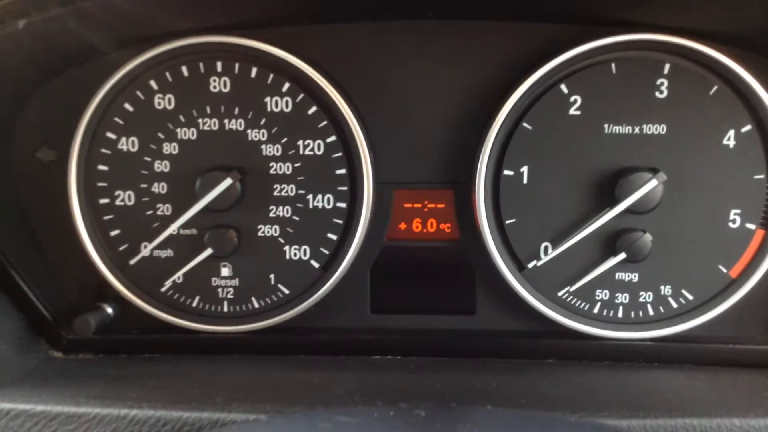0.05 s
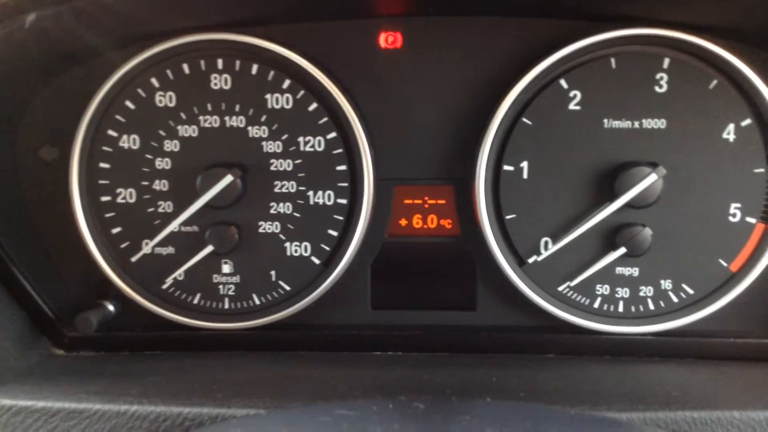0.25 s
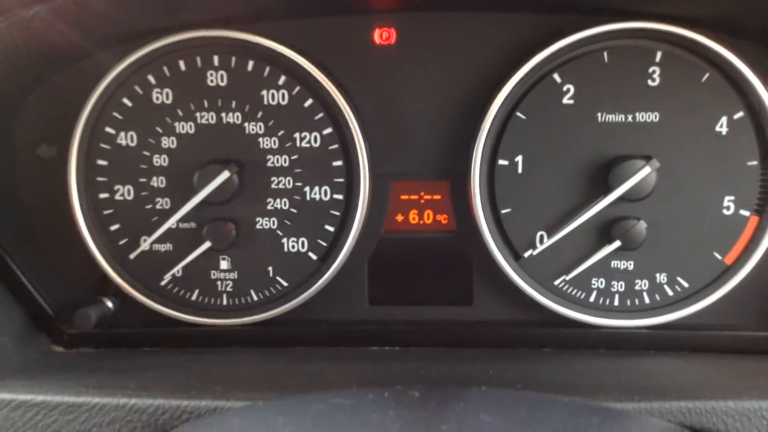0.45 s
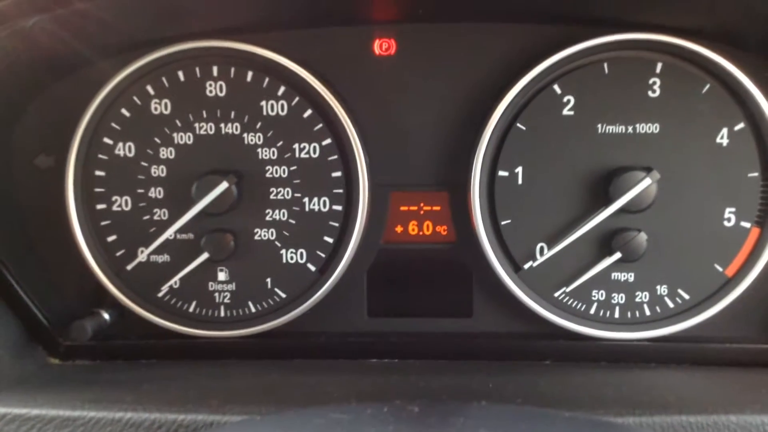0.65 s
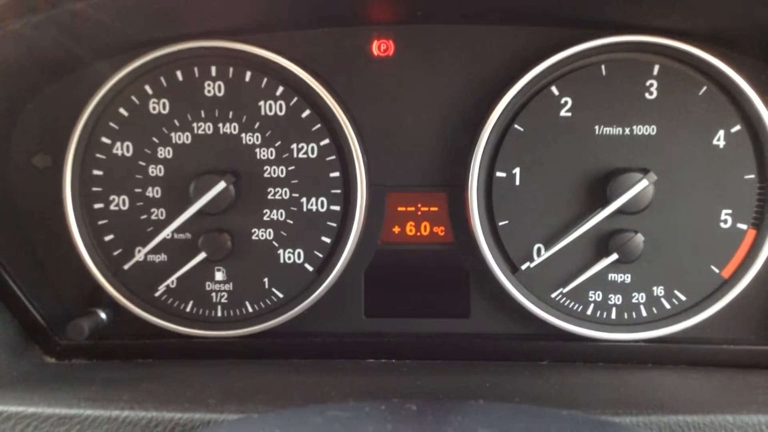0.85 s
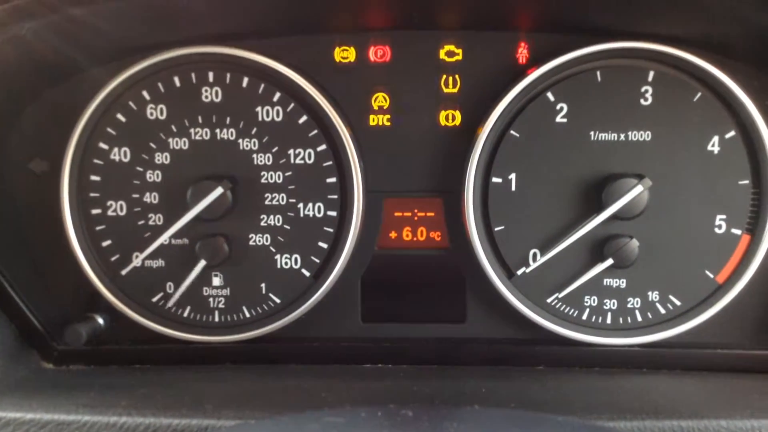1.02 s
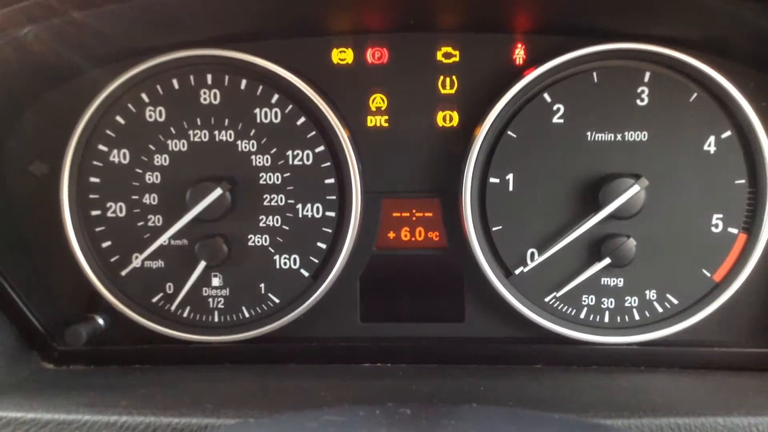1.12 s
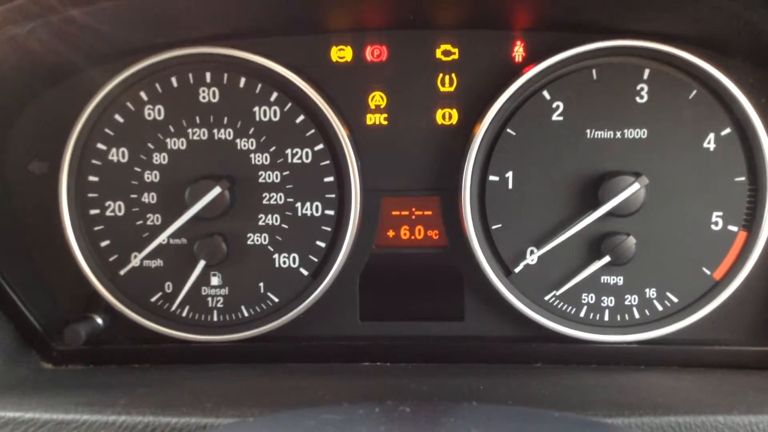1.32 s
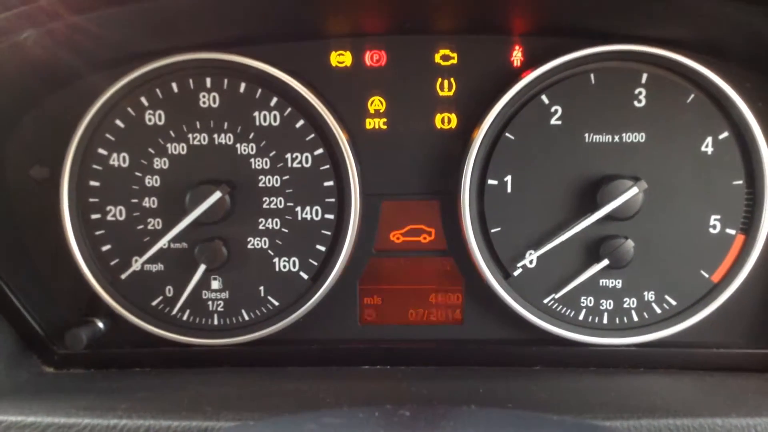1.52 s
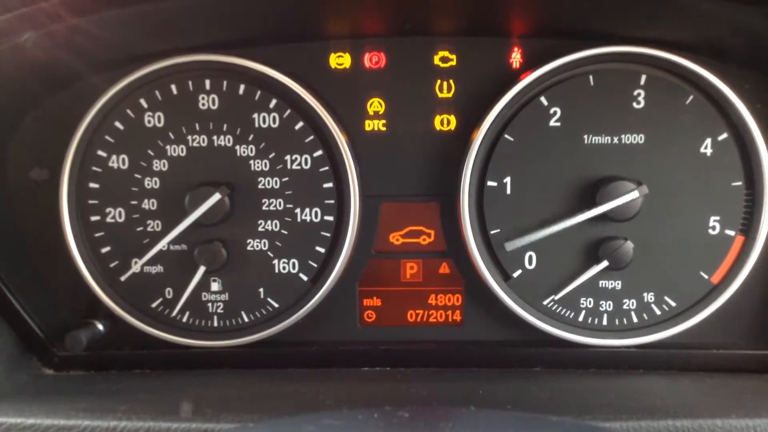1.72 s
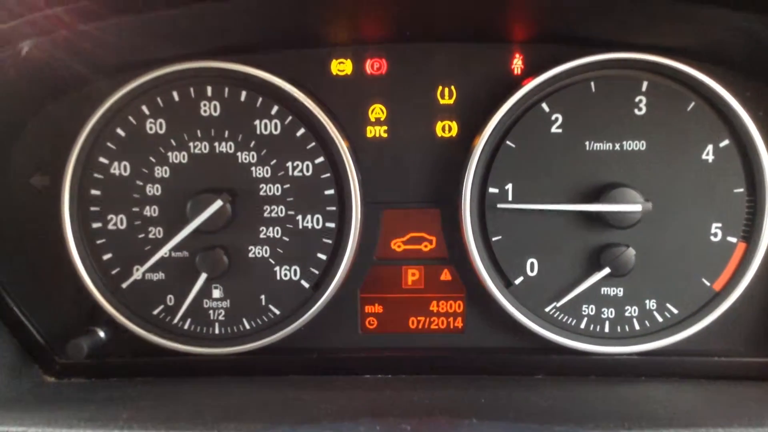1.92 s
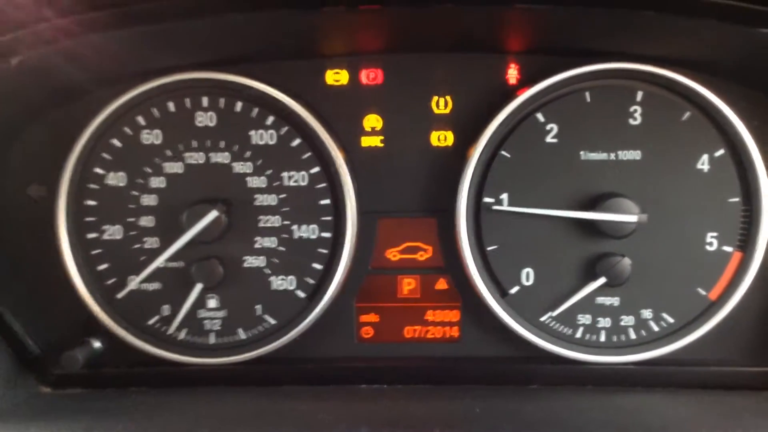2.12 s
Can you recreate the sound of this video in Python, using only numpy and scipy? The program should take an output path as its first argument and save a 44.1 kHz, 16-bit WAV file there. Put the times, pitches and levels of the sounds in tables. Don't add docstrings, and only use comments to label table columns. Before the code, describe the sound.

Diesel engine start inside a parked car, recorded close in a dry padded cabin; sleeve rustling and small clicks come first, then a relay click, rising and falling starter whir, two thuds and faint low rumbling.

```python
import sys
import numpy as np
from scipy import signal
from scipy.fft import rfft, irfft, next_fast_len
from scipy.io import wavfile
from scipy.ndimage import uniform_filter1d, map_coordinates

SR = 44100
rng = np.random.default_rng(int(sys.argv[2]) if len(sys.argv) > 2 else 0)


def dump(signal):
    limited = np.clip(np.atleast_2d(signal).T, -1, 1)
    pcm = np.round(limited * 32767).astype(np.int16)
    wavfile.write(sys.argv[1], SR, pcm)


def volts_from_decibels(level):
    exponent = np.asarray(level, float) / 20
    return 10 ** exponent


N = 95608


def unit(x):
    return x / np.sqrt(np.mean(x ** 2) + 1e-20)


def noise():
    return rng.standard_normal(N)


def curves(rows):
    s, *cols = np.transpose(rows)
    return [np.interp(np.arange(N) / SR, s, c) for c in cols]


def wobble(rate):
    return map_coordinates(rng.standard_normal(int(N * rate / SR) + 4), [np.arange(N) * rate / SR])


def filtered(x, response):
    m = next_fast_len(len(x) + 8192)
    return irfft(rfft(x, m) * response(np.fft.rfftfreq(m, 1 / SR)), m)[:len(x)]


def colour(x, points):
    f, db = np.transpose(points)
    return unit(filtered(x, lambda hz: volts_from_decibels(np.interp(np.log(hz + 1), np.log(f + 1), db, -120, -120))))


def resonant(x, peaks):
    def response(f):
        total = 0
        for k, (hz, width, db) in enumerate(peaks):
            total = total + (-1) ** k * volts_from_decibels(db) * 1j * f * width / (hz * hz - f * f + 1j * f * width)
        return total
    return unit(filtered(x, response))


def pulses(rate, scatter_db):
    return np.diff(np.floor(np.cumsum(rate) / SR), prepend=0) * volts_from_decibels(scatter_db * noise())


def gate(start, length, rise, fall):
    t = np.arange(N) / SR - start
    return np.clip(t / rise, 0, 1) * np.exp(-np.clip(t - length, 0, None) / fall)


def add(out, s, x):
    part = out[round(s * SR):][:len(x)]
    part += x[:len(part)]


def decay(t60):
    return volts_from_decibels(-60 * np.arange(SR // 5) / SR / t60)


def ring(hz, t60, attack):
    t = np.arange(SR // 5) / SR
    drift = np.cumsum(rng.standard_normal(len(t))) * hz / 1e5
    return decay(t60) * (1 - np.exp(-t / attack)) * np.sin(2 * np.pi * hz * t + drift)


def crack(t60):
    return decay(t60) * rng.standard_normal(SR // 5)


# freq_hz, density_db_per_hz
HISS_COLOUR = [(15, -73), (25, -48), (86, 4), (469, -2), (598, -5), (919, -10), (9550, -11.5),
               (11800, -12.5), (15500, -12.5)]


def hiss():
    return volts_from_decibels(-67 + 0.75 * wobble(10.6)) * colour(noise(), HISS_COLOUR)


# start_s, level_db, rub_db
HAND_MOVES = [
    [(0, -43.5, -38.5), (.05, -46.5, -48), (.13, -60.5, -57.5), (.175, -59, -57.5), (.205, -60, -46),
     (.25, -61.5, -61.5), (.39, -65, -61), (.62, -77, -74.5)],
    [(1.86, -87, -54), (2.0, -62, -40), (2.07, -54.5, -38), (2.17, -61.5, -41)],
]
# freq_hz, density_db_per_hz
CLOTH_COLOUR = [(710, -20), (1200, -18), (3610, 0), (4340, 0), (13600, -7), (15500, -7)]
# freq_hz, density_db_per_hz
RUB_COLOUR = [(24, -61), (40, -63), (117, 0.5), (393, -8.5), (483, -6.5), (2500, -19), (3250, -30),
              (5500, -120)]
# start_s, peak_db,
# pitch_hz, t60_s
DULL_KNOCKS = [(.004, -40, 150, .06), (.017, -33, 170, .07), (.019, -41, 640, .05), (.026, -34, 260, .06),
               (.049, -46, 490, .05), (.075, -45, 110, .12), (.182, -38, 150, .1), (.198, -42, 600, .06),
               (.2, -44, 410, .06), (.362, -53, 730, .04), (.41, -52, 1000, .06), (.44, -52, 190, .08),
               (.451, -53, 1250, .04), (.582, -56, 670, .04), (.685, -54, 620, .03), (.748, -57, 1750, .03),
               (.772, -52, 190, .06), (1.035, -48, 140, .08), (1.352, -50, 78, .2), (1.26, -49, 180, .06),
               (1.615, -41, 245, .25), (1.622, -40, 125, .3), (1.695, -50, 900, .04),
               (1.622, -48, 450, .08), (1.675, -49, 400, .08), (1.765, -47, 400, .12),
               (1.89, -51, 310, .08), (2.005, -48, 400, .1), (2.012, -50, 620, .07), (2.025, -51, 850, .06),
               (1.465, -48, 90, .2), (2.07, -50, 345, .3), (2.115, -47, 180, .1)]


def hand():
    out = np.zeros(N)
    for rows, rub_trim_db in zip(HAND_MOVES, (0, -12)):
        level_db, rub_db = curves(rows)
        grain = volts_from_decibels(1.65 * wobble(150) + wobble(30.65))
        rustle = volts_from_decibels(level_db) * colour(grain * noise(), CLOTH_COLOUR)
        rub = volts_from_decibels(rub_db + rub_trim_db + wobble(37.24)) * colour(noise(), RUB_COLOUR)
        start_s, end_s = rows[0][0], rows[-1][0]
        out += (rustle + rub) * gate(start_s - .05, end_s - start_s + 0.053, 0.13, 0.13)
    for start_s, peak_db, hz, t60_s in DULL_KNOCKS:
        add(out, start_s, volts_from_decibels(peak_db) * ring(hz, t60_s, .5 / hz))
    return out


# start_s, peak_db, pitch_hz, broadband_share_db
PLASTIC_CLICKS = [(0.026, -43, 5750, 16), (0.0498, -27.5, 4330, 4.5), (.034, -39, 4500, -7),
                  (0.0834, -32, 3070, 4), (.116, -45.5, 3500, -11), (.165, -44, 12000, -5),
                  (.181, -47.5, 3500, 6), (0.195, -31, 3960, -1), (0.2017, -37, 8240, 13.5),
                  (.362, -49, 2000, -3), (0.408, -39.5, 2040, 12), (0.41, -40.5, 6460, 1),
                  (0.503, -50, 11000, 3), (0.5822, -57, 2230, 14), (.657, -49.5, 13000, -5),
                  (.722, -59, 4960, 8), (.781, -53.5, 2590, 7.5), (0.8143, -42, 2000, -3),
                  (1.05, -53, 7600, 13.5), (1.563, -48.5, 950, 5), (2.0, -41, 1110, -13),
                  (2.0143, -33, 3840, -12), (2.0152, -32, 2170, -23), (2.059, -42.5, 9150, 8),
                  (2.085, -32, 3400, -3)]


def plastic_clicks():
    out = np.zeros(N)
    for start_s, peak_db, hz, share_db in PLASTIC_CLICKS:
        tick, tail = crack(0.011), crack(0.083)
        width_hz = 0.53 * hz
        tuned = filtered(tick + volts_from_decibels(-11) * tail,
                         lambda f: (1j * f * width_hz / (hz * hz - f * f + 1j * f * width_hz)) ** 2)
        broad = filtered(tick + volts_from_decibels(-7.5) * tail, lambda f: 1j * f / (600 + 1j * f) / (1 + 1j * f / 9000))
        click = tuned / np.abs(tuned).max() + volts_from_decibels(share_db) * broad / 2
        add(out, start_s, volts_from_decibels(peak_db - 2.5) * click)
    return out


# [(freq_hz, width_hz, level_db)]
SERVO_RUNS = [
    ((0.232, 0.036, -56.5), [(777, 140, 1), (3430, 63, -6.5)]),
    ((.72, 0.03, -68), [(595, 260, 3), (1750, 320, 0)]),
    ((.77, 0.22, -60), [(227, 310, 9.5), (1370, 180, 5.5), (2000, 840, -2)]),
]


def servos():
    out = np.zeros(N)
    for (start_s, length_s, level_db), housing in SERVO_RUNS:
        motor = filtered(noise(), lambda hz: hz > 110)
        out += volts_from_decibels(level_db) * gate(start_s, length_s, 0.0078, 0.11) * resonant(motor, housing)
    return out


# start_s, level_db
KEY_SEAT = (.43, -23)
# freq_hz, level_db, t60_s
KEY_MODES = [(4130, -11, .03), (4485, -3, .035), (5090, -12, .03), (7600, -12, .03), (10300, -2, .028),
             (10780, -2, .028), (13245, -5, .055)]


def key():
    out = np.zeros(N)
    start_s, level_db = KEY_SEAT
    steel = sum(volts_from_decibels(db) * ring(hz, t60_s, 0.000067) for hz, db, t60_s in KEY_MODES)
    for late_s, hit_db in [(0, -10), (.006, -13)]:
        scrape = filtered(crack(0.054), lambda f: (0.58 + (f > 3000)) / (1 + (f / 13600) ** 20))
        add(out, start_s + late_s, volts_from_decibels(level_db + hit_db) * (steel + 0.6 * scrape))
    return out


# start_s, level_db
ENGINE_LEVEL = [(.74, -98), (.97, -60), (1.02, -50.5), (1.26, -54), (1.325, -56), (1.4, -47.5),
                (1.44, -53.5), (1.52, -51.5), (1.6, -49), (1.64, -46), (1.72, -48), (1.9, -54), (2.0, -54),
                (2.17, -54.5)]
# freq_hz, density_db_per_hz
RUMBLE_COLOUR = [(15, -39), (25, -13), (134, 4), (395, 2.5), (944, -13.5), (2210, -26.5), (2400, -39),
                 (3450, -26), (4000, -31), (5200, -55), (8800, -120)]
# freq_hz, width_hz, level_db
BODY_MODES = [(118.6, 67, -14.5), (235, 56, -6.5), (327, 20, -3), (407.2, 10.8, 2), (455, 12, 1),
              (542, 41, -10.5), (650, 60, -10.5), (831, 49, -9), (1194, 270, -22)]
# freq_hz, width_hz, level_db
PUMP_MODES = [(2173, 72, 3.5), (1760, 110, -2.5), (3420, 670, -7.5)]


def engine():
    level_db, = curves(ENGINE_LEVEL)
    crank_per_s, idle_per_s = 11, 45
    running = gate(1.56, 3, .3, 1)
    beats = pulses(crank_per_s + (idle_per_s - crank_per_s) * running, scatter_db=-1.0) * np.sqrt(running)
    swell = unit(signal.fftconvolve(beats, decay(0.095))[:N])

    rumble = colour(noise() * (1 + .15 * swell), RUMBLE_COLOUR)
    before_firing = 1 - gate(FIRST_FIRINGS[0][0], N, FIRE_RISE_S, 1)
    rumble = rumble - before_firing * filtered(rumble, lambda hz: hz < BODY_MODES[0][0])
    thuds = volts_from_decibels(-13) * resonant(beats, BODY_MODES)
    body = volts_from_decibels(-8.5) * resonant(noise(), BODY_MODES)
    low = volts_from_decibels(level_db) * (rumble + thuds + body)

    clatter = colour(noise() * (1 + 0.5 * swell), [(900, -6), (1500, -10), (3500, -12)])
    clatter_growth = 1
    high = volts_from_decibels(clatter_growth * (level_db + 44.5) - 47.5 - 16.5) * clatter

    pump = volts_from_decibels(-58 + 2.5 * wobble(25.2)) * gate(1.717, 3, 0.36, 1) * resonant(noise(), PUMP_MODES)
    return (low + high) * gate(ENGINE_LEVEL[0][0], 3, 0.04, 1) + pump


# start_s, level_db
RELAY_EVENTS = [
    (0.9654, -28.5),
    (1.71, -30),
]
# freq_hz, level_db, t60_s
RELAY_CLOSE_MODES = [(1211, -4, 0.059), (1500, -14.5, 0.13), (1972, -5.5, 0.047), (2134, -1, 0.02),
                     (4150, -6.5, 0.061), (4450, -3, 0.028), (7400, -26, 0.04), (11800, -9, 0.028),
                     (13180, -5.5, 0.02)]
# freq_hz, level_db, t60_s
RELAY_OPEN_MODES = [(1180, 0, .09), (2100, -9, .035), (4300, -17, .03), (4950, -15, .03), (9324, -22, .05),
                    (12900, -16, .045)]


def relays():
    out = np.zeros(N)
    actions = [(RELAY_CLOSE_MODES, .68, .0005), (RELAY_OPEN_MODES, .25, .003)]
    for (start_s, level_db), (table, snap_gain, rise_s) in zip(RELAY_EVENTS, actions):
        modes = sum(volts_from_decibels(db) * ring(hz, t60_s, rise_s) for hz, db, t60_s in table)
        snap = filtered(crack(0.1), lambda f: 1j * f / (400 + 1j * f))
        add(out, start_s, volts_from_decibels(level_db - 8.5) * (modes + snap_gain * snap))
    return out


# start_s, pitch_hz, level_db, second_harmonic_db, third_harmonic_db
GEAR_MESH = [(1.03, 175, -55, -62, -55), (1.078, 205, -56, -58, -66), (1.1, 230, -47, -38, -54),
             (1.155, 264, -54, -53, -64), (1.175, 320, -48, -53, -72), (1.205, 325, -41, -49, -64),
             (1.245, 272, -51, -43, -46), (1.27, 238, -45, -44, -66), (1.32, 225, -57, -68, -74)]
# freq_hz, width_hz, level_db
PANEL_MODES = [(825, 50, 3), (1280, 50, -2)]


def starter():
    hz, first_db, second_db, third_db = curves(GEAR_MESH)
    speed_hz = uniform_filter1d(hz, size=400) * (1 + .016 * wobble(65))
    phase = 2 * np.pi * np.cumsum(speed_hz) / SR
    start_s, end_s = GEAR_MESH[0][0], GEAR_MESH[-1][0]
    on = gate(start_s - .03, end_s - start_s + 0.026, 0.033, 0.014)

    def harmonic(db, k):
        return on * np.sqrt(2) * volts_from_decibels(db + 1.3 * wobble(50.46)) * np.sin(k * phase)

    mean_db = (first_db + second_db) / 2
    low = harmonic(first_db, 1) + harmonic(second_db, 2)
    fourth = harmonic(mean_db - 19, 4)
    upper = harmonic(third_db, 3) + np.std(fourth) * resonant(fourth, PANEL_MODES)
    through_body = volts_from_decibels(-13) * np.std(low) * resonant(low, [(328, 25, 0), (466, 25, 0)])
    grind_modes = BODY_MODES[:2] + BODY_MODES[4:] + [(2000, 1460, -30)]
    grind = volts_from_decibels(mean_db - 5) * on * resonant(noise(), grind_modes)
    return low + through_body + upper + grind


# start_s, length_s, level_db
FIRST_FIRINGS = [
    (1.337, 0.046, -34.5),
    (1.452, 0.047, -35.5),
]
# freq_hz, level_db
SHAKE_MODES = [(328, 0), (400, -9), (466, -16), (537, -13), (695, -16), (812, -15), (1260, -28)]
FIRE_RISE_S, FIRE_FALL_S = 0.0059, 0.0068


def firings():
    out = np.zeros(N)
    for start_s, length_s, level_db in FIRST_FIRINGS:
        t = np.arange(N) / SR - start_s - .03
        shake = np.zeros(N)
        for hz, mode_db in SHAKE_MODES:
            shake += volts_from_decibels(mode_db + 0.94 * wobble(40.93)) * np.sin(2 * np.pi * hz * t + 0.54 * wobble(39.15))
        roar = volts_from_decibels(-7.5) * resonant(noise(), BODY_MODES + [(2870, 930, -37)])
        bang = volts_from_decibels(-5 * (1 - gate(start_s + 0.0151, N, 0.0017, 1)))
        burst = gate(start_s, length_s, FIRE_RISE_S, FIRE_FALL_S)
        out += volts_from_decibels(level_db) * bang * burst * (shake + roar)
        linger = gate(start_s, length_s, FIRE_RISE_S, 0.076)
        out += volts_from_decibels(level_db - 17.5) * linger * np.sin(2 * np.pi * SHAKE_MODES[0][0] * t)
    return out


def cabin(near):
    tail = crack(0.06)
    wet = signal.fftconvolve(near, np.pad(tail, (130, 0)) / np.linalg.norm(tail))[:N]
    return near + volts_from_decibels(-14) * wet


def scene():
    contacts = cabin(plastic_clicks() + key() + relays())
    return (hiss() + hand() + contacts + servos() + engine() + starter() + firings())[None]


def low_pass(x):
    return signal.sosfilt(signal.butter(12, 16430, fs=SR, output="sos"), x)


def record(dry):
    low_cut_hz, top_hz = 28.6, 15150
    band = filtered(dry[0], lambda hz: (1j * hz / (low_cut_hz + 1j * hz)) ** 2 / (1 + (hz / top_hz) ** 60))
    return low_pass(band[None])


dry = scene()
out = record(dry)
dump(out)
```